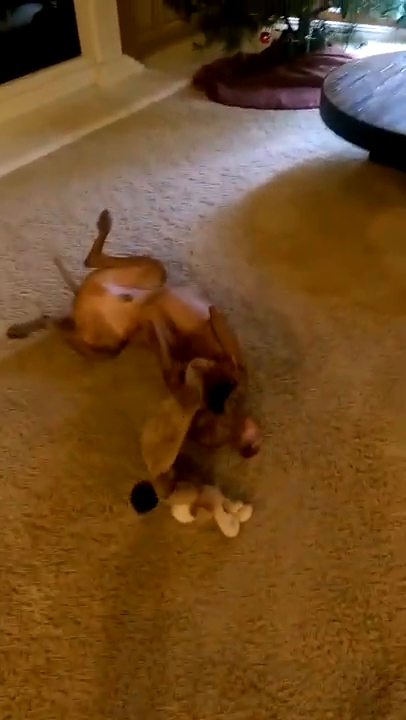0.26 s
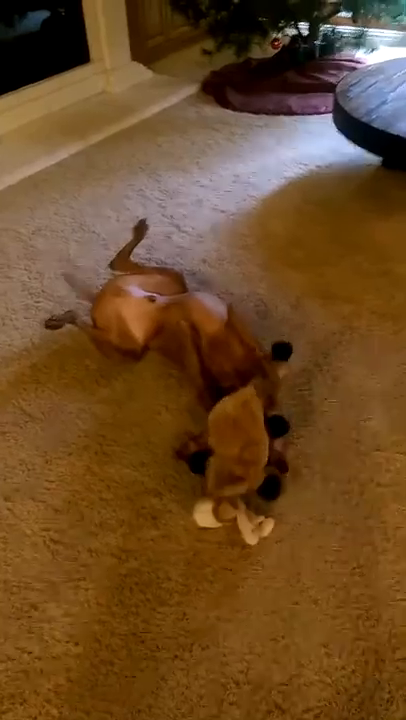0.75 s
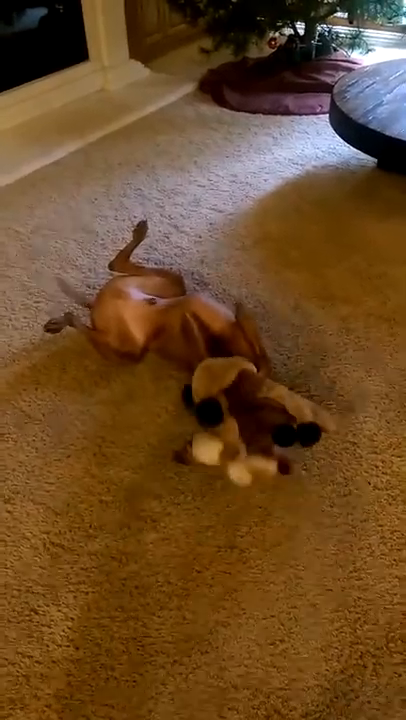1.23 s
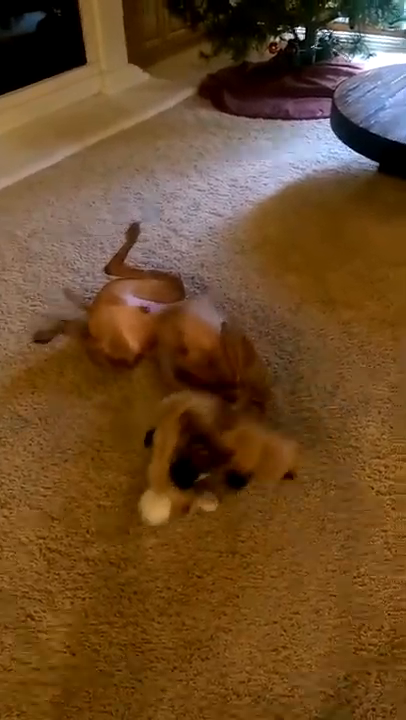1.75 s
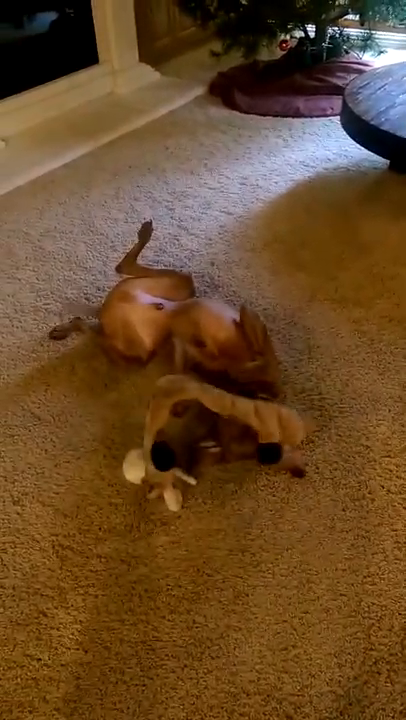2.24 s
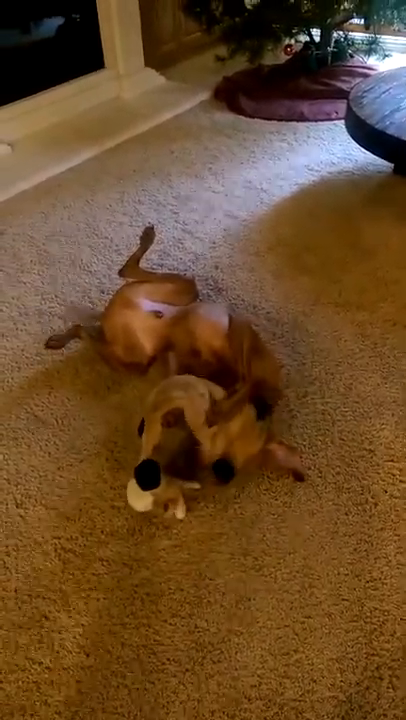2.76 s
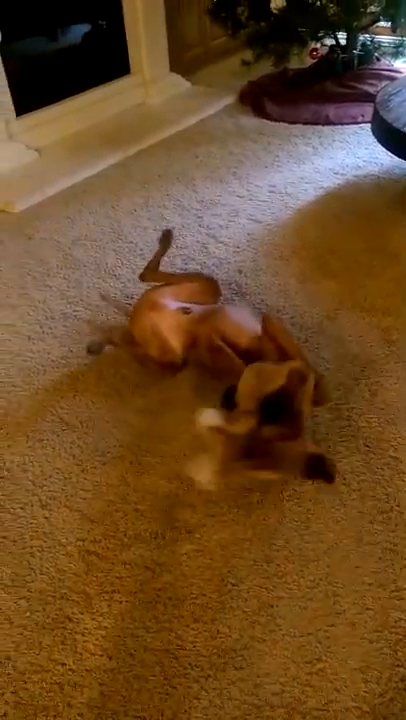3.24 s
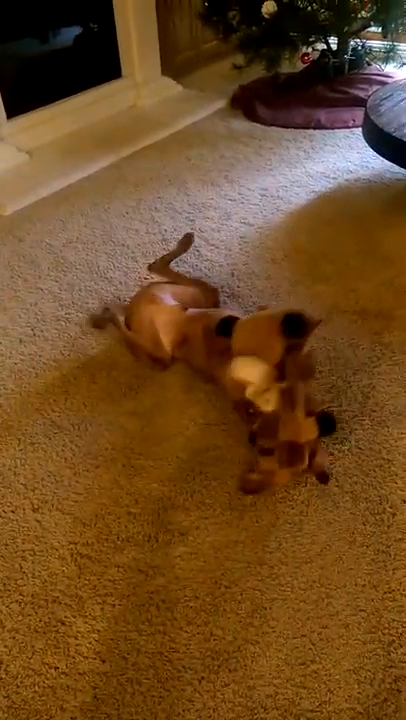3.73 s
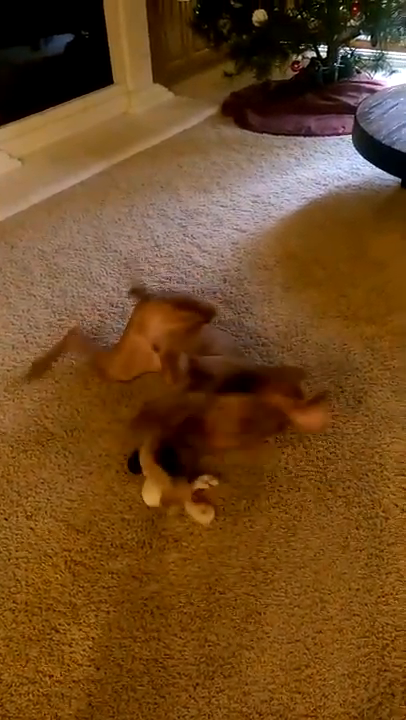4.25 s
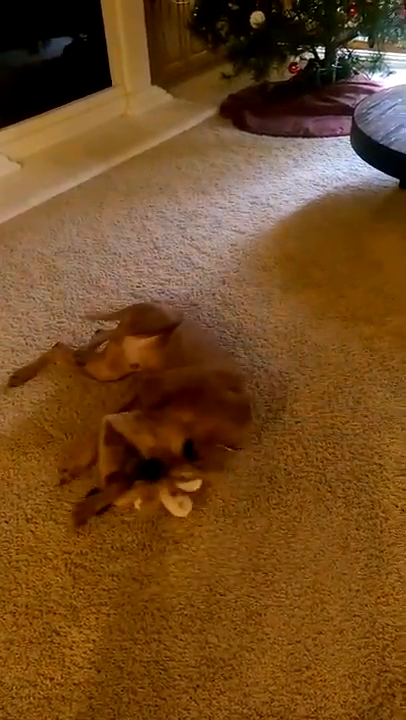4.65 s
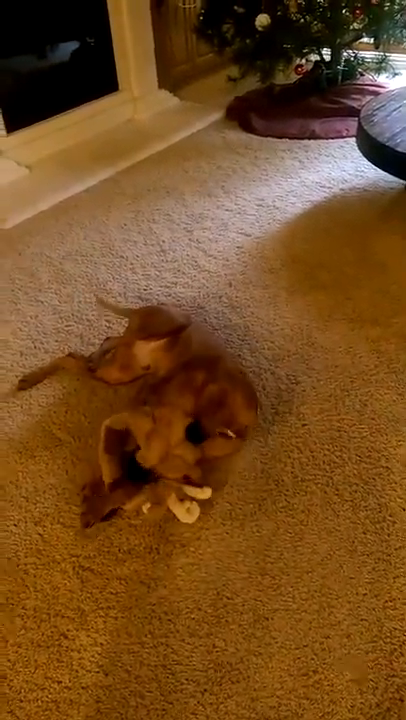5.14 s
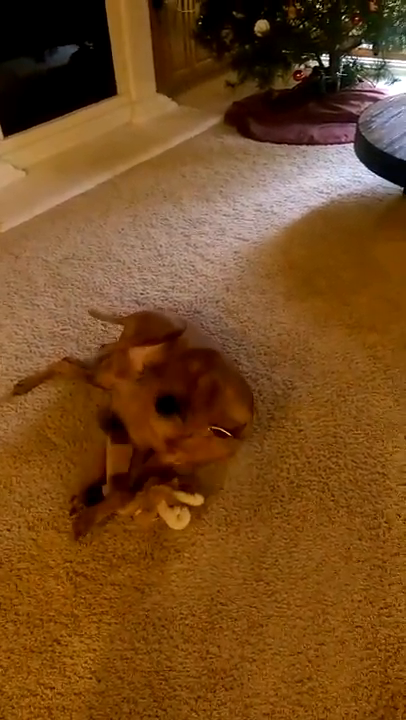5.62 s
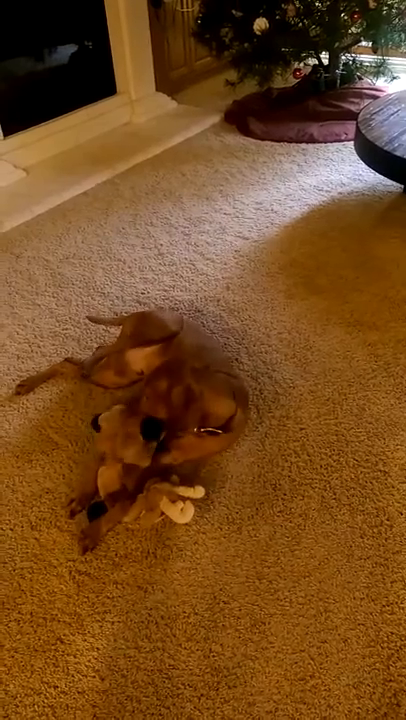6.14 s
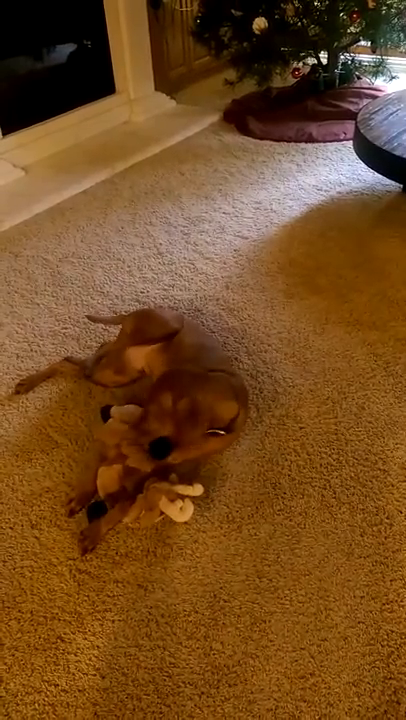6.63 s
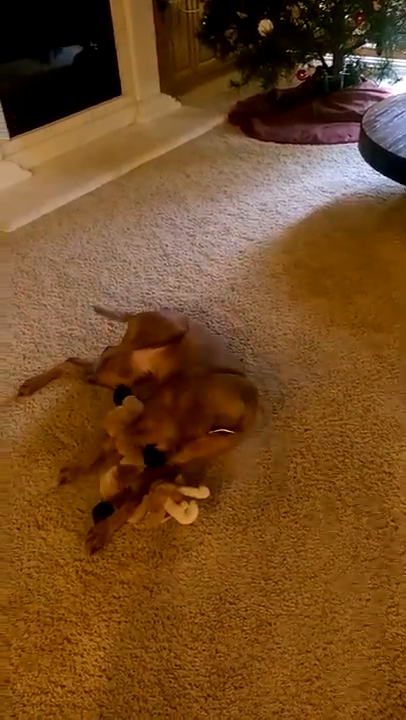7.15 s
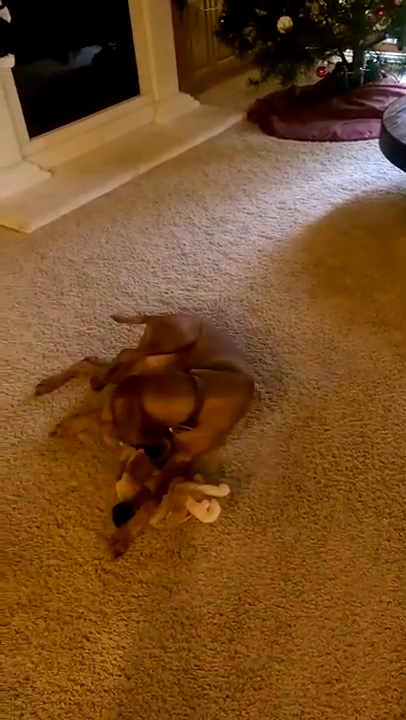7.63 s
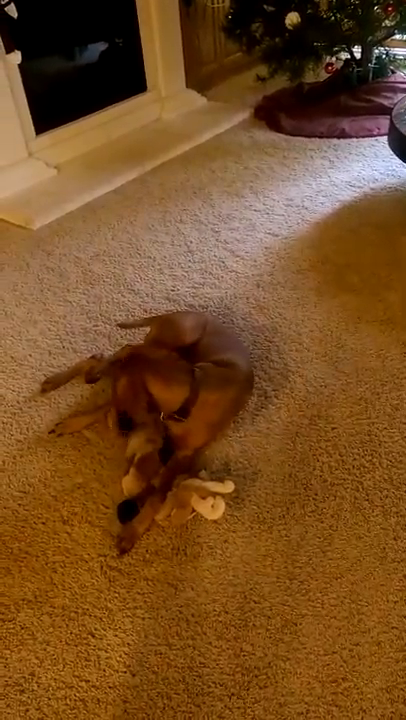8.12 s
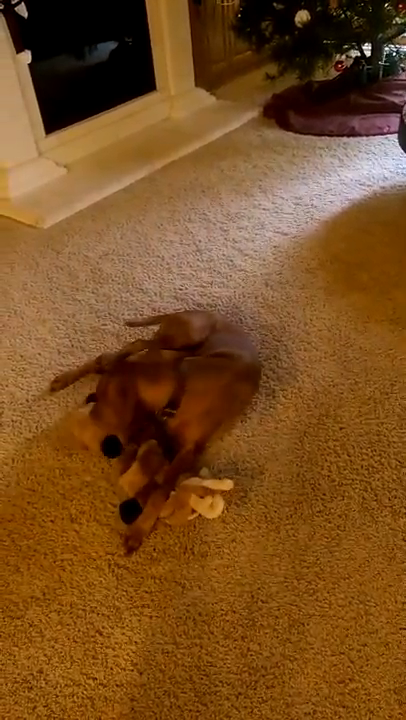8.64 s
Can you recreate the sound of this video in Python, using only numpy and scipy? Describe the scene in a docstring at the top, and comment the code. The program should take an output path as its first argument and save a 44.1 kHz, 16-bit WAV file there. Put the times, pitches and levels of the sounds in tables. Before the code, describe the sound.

Indoors, a couple of metres from the microphones, a squeaky toy is bitten in irregular runs. Quick reedy peeps are followed by raspy, arching squeals: a burst at the start, a lone squeal near two seconds, a busier run from three and a half to just past six, then fainter squeaks near the end. Soft plush rubs, tooth knocks and collar tag clinks sit over low rumble and hum.

```python
"""A living room carpet, a camera's two microphones a couple of metres from a dog chewing a plush toy.
The room's tail of an earlier squeal opens; bites and squeals follow at once, and again from 3.4 to 6.3 s.
A bite drives air through the squeaker's reed at a nearly steady pitch; the refilling bulb squeals in an arch.
Between them plush rubs on carpet and the body shifts; from 2.2 s teeth knock, from 4.9 s collar tags clink.
Quieter squeaks come near the end; low rumble, thin hiss and a wavering hum of the house run throughout."""
import sys
import numpy as np
from scipy import signal
from scipy.fft import rfft, irfft, next_fast_len
from scipy.io import wavfile

SR = 44100
rng = np.random.default_rng(int(sys.argv[2]) if len(sys.argv) > 2 else 0)


def generate_wav(sig):
    """Save sig (samples, or channels by samples) to the path in sys.argv[1] as 16-bit PCM at SR."""
    pcm = np.round(np.clip(np.atleast_2d(sig).T, -1, 1) * 32767).astype(np.int16)
    wavfile.write(sys.argv[1], SR, pcm)


N = 391608

# Bites, each pressing harder or easing off at most once; from bass on, the grip on the toy:
# (start [s], length [s], base pitch [Hz], base level [dB], nudge after [s], nudge [octaves], bass [dB],
#  treble [dB], cavity [Hz], cavity [dB], right microphone [dB], rasp [0-1])
BITE_GESTURES = [(0.168, .067, 854, -22, 0.015, -0.12, -2, 3, 5840, 4, -9.5, .1),
                 (0.792, 0.012, 864, -26, 0, 0, -4.5, -3.5, 9600, 5.5, -7, .8),
                 (3.453, 0.064, 849, -21.5, .04, -0.21, 0, 1.5, 4640, 7.5, -11, .3),
                 (3.98, 0.065, 865, -22, 0.041, -0.15, -13.5, -3.5, 6000, 5, -9, .1),
                 (4.426, .028, 904.5, -22.5, 0, -0.014, -9, -4, 6200, -3, -9.5, .2),
                 (5.444, .095, 852.8, -25, 0.055, 0.018, -11.5, 1.5, 5300, -5.5, -9, .06),
                 (6.044, 0.12, 829, -28, .098, .058, -5.5, 8.5, 7460, 10.5, -9, 0.12),
                 (7.956, 0.16, 831.8, -40, 0.07, 0.045, 2, 5, 3870, 7, -6.5, 0.25)]
# Arching squeals of air rushing through the reed, mostly as the bulb refills; the jaws may nudge the flow once:
# (start [s], length [s], top pitch [Hz], last pitch [Hz], base level [dB], rise [s],
#  hold [under 1 sags early, over 1 holds], nudge after [s], nudge [octaves], bass [dB], treble [dB],
#  cavity [Hz], cavity [dB], right microphone [dB], rasp [0-1])
SQUEAL_GESTURES = [(-0.22, .12, 1119, 1061, -29.5, 0.04, 1.8, 0, 0.045, 4, 4.5, 5300, 1.5, -5, .8),
                   (0.229, 0.054, 3120, 2580, -20.5, 0.053, 0.88, 0.011, 0.31, -9.5, 3, 6330, 8.5, -11, 0.28),
                   (0.323, 0.13, 1201, 1016, -26, .064, 2.4, 0.0226, -.05, -2.5, 3, 4770, 3.5, -7.5, 0.74),
                   (0.878, 0.14, 1483, 748.5, -27.5, 0.021, 0.79, 0.078, 0.1, -2.5, -0.5, 3200, -1, -8, .65),
                   (2.118, 0.061, 1695, 1073, -22, 0.039, 0.84, 0.0083, .18, -3.5, 2.5, 9200, -2, -8.5, .92),
                   (3.614, 0.11, 1209, 910, -24, 0.015, 23.3, 0, 0.054, 5, 6.5, 4900, 7, -12, 1),
                   (4.069, .084, 1801, 846, -20.5, .044, 1.7, .062, -0.19, -3, 1, 5600, 5, -13, .85),
                   (4.518, .088, 1288, 865, -24, 0.032, 16, .071, 0.27, -3, 6.5, 2700, 1.5, -13, 0.71),
                   (5.036, .105, 1300, 850.4, -22.5, .025, .58, .082, .12, -6, 8.5, 3600, -2.5, -12.5, .3),
                   (5.558, 0.11, 3380, 953, -18.5, .047, 1.64, .024, -0.21, -4, 6.5, 5600, 1.5, -10.5, .4),
                   (6.186, 0.12, 1003, 916, -27.5, 0.015, 0.82, 0.028, .17, 0.5, 3.5, 8600, 20, -4.5, .28),
                   (8.151, .05, 1030, 894, -36.5, 0.015, 0.94, 0.035, -0.072, -6, -5.5, 8800, 14.5, -4, .6),
                   (8.523, 0.025, 972, 932, -34.5, .012, 1.2, 0.00043, -.15, 2.5, -1.5, 8700, 20, -0.5, 0.82)]
# The reed heard through bulb and plush, blowing out: (frequency [Hz], relative level [dB])
BLOWING_COLOUR = [(800, -12.5), (1700, -9.5), (2550, -10), (3400, -13), (4250, -7.5), (5200, -5.5),
                  (6200, -8), (7400, -14), (8500, -19), (10000, -23), (12500, -31), (15000, -36)]
# The same, drawing in: (frequency [Hz], relative level [dB])
DRAWING_COLOUR = [(850, -7.5), (1250, -6.5), (2400, -5), (3300, -9), (4200, -5), (5400, -7), (6100, -13.5),
                  (6900, -26), (8000, -21.5), (11000, -22.5), (13300, -24.5), (15000, -34.5)]
# Shading of the right microphone by the camera body: (frequency [Hz], gain [dB])
CAMERA_SHADE = [(900, 6.5), (2500, 1.5), (5500, -7), (9000, -26), (14000, 5.5)]
# Knocks of teeth and head: (time [s], peak level [dB], centre [Hz], decay [s])
TOOTH_KNOCKS = [(2.17, -41, 232, 0.016), (3.357, -53, 1180, 0.015), (3.712, -20, 2960, 0.00054),
                (3.968, -36, 2970, 0.003), (4.916, -40, 970, 0.0039)]
# Collar tags touching: (time [s], level [dB])
TAG_CLINKS = [(4.916, -48.5), (5.443, -39), (6.902, -39.5)]
# Ringing modes of the tags: (frequency [Hz], relative level [dB], t60 [s])
TAG_RINGING = [(5640, -18, 0.41), (5740, -11.5, .2), (12030, -13.5, .25), (12740, -10, .15),
               (13650, -3.5, .25)]
# Plush and fur rubbing on carpet: (time [s], length [s], level before fades [dB])
CARPET_RUBS = [(0.657, 0.15, -66.5), (1.094, 0.17, -62), (3.351, 0.13, -57), (3.874, 0.08, -60),
               (7.755, 0.1, -71), (8.366, 0.14, -67.5)]
# The dog's body shifting on the floor: (time [s], length [s], level before fades [dB])
BODY_SHIFTS = [(0, 1.14, -68.5), (3.202, 1.62, -67.5), (4.396, 2.3, -69), (7.7, 1.24, -68.5)]
# Reverberation of the room: (frequency [Hz], t60 [s], relative level [dB])
ROOM_BANDS = [(581.4, 0.58, 8), (1482, 0.57, 1.5), (4340, 0.53, -3.5), (8020, 0.51, -4), (13200, 0.43, 1.5)]
# Spectrum of the still air of the house: (frequency [Hz], relative density [dB])
AIR_SPECTRUM = [(20, -20), (55, -4.5), (90, -6.5), (160, -3), (230, -1), (320, -8.5), (430, -9.5),
                (620, -18), (1200, -20), (4000, -24), (16000, -29)]
# Hum lines of an appliance: (frequency [Hz], level [dB])
HUM_LINES = [(59.7, -73), (119.4, -69), (215.3, -72), (360.7, -76), (419.9, -75)]
# Left-right likeness of the air: (frequency [Hz], likeness [0-1])
AIR_LIKENESS = [(200, 0.56), (1500, 0.32), (8000, .1)]

AIR_DB = -63  # before the slight left-right balance
LEAD_S = 0.3  # the mix begins this early
EDGE_HZ = 15900  # upper edge of the recorder
# Bite: depth and time of the opening scoop and closing droop; nudge width; level follows pitch
SCOOP_OCTAVES, SCOOP_S, DROOP_OCTAVES, DROOP_S = 0.05, 0.007, 0.1, 0.007
BITE_NUDGE_S, BITE_DB_PER_OCTAVE = 0.011, 51.5
# Squeal: one starting pitch, weaker ends than top, and a starved reed below the starting pitch
START_HZ, START_DB, STOP_DB, STARVED_DB_PER_OCTAVE = 947, -5.5, -7, 30
SQUEAL_NUDGE_S, NUDGE_DB_PER_OCTAVE = 0.008, 3
# Rasp: pitch flutter, strength of half-order lines, harmonic where they are full, growth time [s]
RASP_FLUTTER, DOUBLING, DOUBLING_HARMONIC, DOUBLING_S = 0.015, 0.94, 3.5, 0.02
# Width of the cavity resonance as a share of its frequency
BITE_CAVITY_SHARE, SQUEAL_CAVITY_SHARE = 0.11, 0.16


def squeaker(mix, rows, gesture, colour, cavity_share, release_s, room_db=-8.5, turned=0.47):
    """Sends each squeak to the left microphone, the shaded right one a moment later, and the room."""
    for *push, bass_db, treble_db, cavity_hz, cavity_db, right_db, rasp in rows:
        note = gesture(*push)
        grip = bass_db, treble_db, cavity_hz, cavity_share * cavity_hz, cavity_db
        hz, response = passage(colour, grip)
        left = squeak(note, hz, response, np.clip(rasp, 0, 1), release_s)
        later = np.pad(left, (4, 0))  # samples of extra path
        right = shaped(later, lambda f: amp(read(CAMERA_SHADE, f)))[:len(left)]
        # a toy turned away from the camera sounds both more central and more distant
        wet_db = room_db + turned * (right_db + 15.5)
        add(mix, note[0][0], np.array([left, amp(right_db) * right, amp(wet_db) * left]))


def bite(start, length, hz, db, nudge_s, nudge_octaves):
    """Pitch and level under the closing jaws: pressure builds, is nudged once and runs out."""
    t = np.linspace(0, length, 200)
    scoop = SCOOP_OCTAVES * np.exp(-t / SCOOP_S)
    droop = DROOP_OCTAVES * np.exp((t - length) / DROOP_S)
    octaves = nudge_octaves * bell(t, nudge_s, BITE_NUDGE_S) - scoop - droop
    return np.transpose([start + t, hz * 2 ** octaves, db + BITE_DB_PER_OCTAVE * octaves])


def squeal(start, length, top_hz, last_hz, db, rise_s, hold, nudge_s, nudge_octaves):
    """Pitch and level follow the air flow, which swells to a top, holds and gives out."""
    t = np.linspace(0, length, 200)
    building = np.cos(np.pi / 2 * np.minimum(t / rise_s, 1)) ** 2
    spent = np.clip((t - rise_s) / (length - rise_s), 0, 1) ** abs(hold)
    nudge = nudge_octaves * bell(t, nudge_s, SQUEAL_NUDGE_S)
    hz = top_hz * (START_HZ / top_hz) ** building * (last_hz / top_hz) ** spent * 2 ** nudge
    ends_db = START_DB * building + STOP_DB * spent
    starved_db = STARVED_DB_PER_OCTAVE * np.minimum(np.log2(hz / START_HZ), 0)
    level_db = db + ends_db + NUDGE_DB_PER_OCTAVE * nudge + starved_db
    return np.transpose([start + t, hz, level_db])


def passage(colour, grip):
    """Causal response from reed to air: the jaws cover the toy and form a cavity around it."""
    bass_db, treble_db, cavity_hz, width_hz, cavity_db = grip
    hz = abs(np.fft.fftfreq(2048, 1 / SR))
    bass_shelf = bass_db / (1 + (hz / 1300) ** 6)
    treble_shelf = treble_db / (1 + (7000 / (hz + 1)) ** 10)
    db = read(colour, hz) + bass_shelf + treble_shelf + cavity_db * bell(hz, cavity_hz, width_hz)
    # minimum phase from the log gain
    response = np.exp(np.conj(signal.hilbert(np.log(amp(db)))))
    half = len(hz) // 2
    return hz[:half], response[:half]


def squeak(note, hz, response, rasp, release_s, hiss_db=-27, rasp_hiss_db=18, drift=0.0033,
           waver_db=2, pure_hz=3400, attack_s=0.00364):
    """The reed chops the air once a cycle; when it rasps it flutters, hisses and sounds between its harmonics."""
    s, pitch, level_db = np.transpose(note)
    t = np.arange(s[0] - attack_s / 2, s[-1] + release_s / 2, 1 / SR)
    flutter = (0.0015 + RASP_FLUTTER * rasp) * wander(len(t), hz=600)
    pitch = np.interp(t, s, pitch) * (1 + drift * wander(len(t), hz=60.6) + flutter)
    angle = 2 * np.pi * np.cumsum(pitch) / SR
    k = np.arange(1, 20, 0.5)[:, None]  # harmonics and the half-orders between
    # driven fast, the reed swings more nearly as a sine
    rolloff = k ** -((pitch / pure_hz) ** 2)
    partials = np.interp(k * pitch, hz, response) * (k * pitch < SR / 2) * rolloff

    # long and short cycles soon begin to alternate: unsteady half-order lines, stronger higher up
    between = k % 1 > 0
    growth = 1 - np.exp(-(t - t[0]) / DOUBLING_S)
    doubling = DOUBLING * rasp ** 2 * np.minimum(k / DOUBLING_HARMONIC, 1) * growth
    waver = np.array([wander(len(t), hz=50) for _ in k])
    smear = np.array([wander(len(t), hz=160) for _ in k])
    smear_depth = np.where(between, 1, rasp * np.minimum(k / 8, 1))
    partials = partials * np.where(between, doubling, 1) * amp(waver_db * waver)
    partials = partials * np.exp(1j * smear * smear_depth)

    # the stuffing blunts each pulse by scattering its phases
    scatter = 0.35 * rng.standard_normal(k.shape)
    waves = (partials * np.exp(1j * (k * angle + scatter))).real
    power = (abs(partials) ** 2).sum(0) / 2
    tone = waves.sum(0) / np.sqrt(power)

    puffs = rng.standard_normal(len(t)) * (1 + np.cos(angle))
    low_hz = 2 * pitch.mean()  # the hiss thins out below this
    hiss = unit(shaped(puffs, lambda f: np.interp(f, hz, abs(response)) * np.minimum(f / low_hz, 1) ** 4))
    gate = np.clip(np.minimum((t - t[0]) / attack_s, (t[-1] - t) / release_s), 0, 1) ** 2
    level = amp(np.interp(t, s, level_db))
    return gate * level * (tone + amp(hiss_db + rasp_hiss_db * rasp) * hiss)


def knock(hz, decay):
    """A dead blow of teeth or head: a noise burst that dies at once."""
    t = np.arange(SR // 8) / SR
    burst = band_noise(len(t), hz, octaves=0.97) * np.exp(-t / decay)
    return burst / abs(burst).max()


def clink(tick_db=-1, tick_s=0.0017, damped_s=0.042, damping_s=0.08):
    """Tags tick and ring until they fall back against the fur."""
    t = np.arange(SR // 4) / SR
    ring = sum(amp(db - 60 * t / t60) * np.sin(2 * np.pi * hz * t) for hz, db, t60 in TAG_RINGING)
    tick = amp(tick_db) * band_noise(len(t), hz=7860, octaves=1.0) * np.exp(-t / tick_s)
    fur = np.exp(-np.maximum(t - damped_s, 0) / damping_s)
    return tick + ring * fur


def rub(length, grain_db=4):
    """Fibres catch and slip under a short stroke, so the noise is grainy."""
    count = round(length * SR)
    grain = amp(grain_db * wander(count, hz=150))
    return unit(band_noise(count, hz=3200, octaves=1.9) * grain) * np.hanning(count)


def shift(length):
    """A dull rumble that swells and fades as the dog rolls."""
    count = round(length * SR)
    return band_noise(count, hz=162, octaves=1.0) * np.sqrt(np.hanning(count))


def room(x, gap_s=0.004, early_db=3, early_s=0.015):
    """Scattered reflections, stronger at first, each band dying at its own speed."""
    count, spacing = 1800, 20  # reflections, samples
    at = np.arange(count) * spacing + rng.integers(0, spacing, (2, count))
    taps = np.zeros((2, count * spacing))
    np.put_along_axis(taps, at, rng.choice([-1., 1.], at.shape), 1)
    hz, t, z = signal.stft(taps, SR, nperseg=256)
    decay_db = -60 * t / read(ROOM_BANDS, hz)[:, None]
    band_db = read(ROOM_BANDS, hz, axis=2)[:, None]
    z = z * amp(decay_db + band_db + early_db * np.exp(-t / early_s))
    gap = round(abs(gap_s) * SR)
    tail = np.pad(signal.istft(z, SR)[1], ((0, 0), (gap, 0)))
    return signal.fftconvolve(x[None], tail / np.linalg.norm(tail[0]), axes=1)[:, :len(x)]


def house():
    """Low rumble and thin hiss of the house, with the wavering hum of an appliance."""
    shared, own = rng.standard_normal((2, N))

    def same(f):
        """Share of the left signal found in the right at each frequency."""
        return np.clip(read(AIR_LIKENESS, f), 0, 1)

    right = shaped(shared, same) + shaped(own, lambda f: np.sqrt(1 - same(f) ** 2))
    pair = np.array([shared, right])
    air = amp(AIR_DB) * unit(shaped(pair, lambda f: amp(read(AIR_SPECTRUM, f))))
    t = np.arange(N) / SR
    hum = np.zeros(N)
    for hz, db in HUM_LINES:
        level = amp(db) * np.sqrt(2) * (1 + 0.2 * wander(N, hz=4))
        hum += level * np.sin(2 * np.pi * hz * t + wander(N, hz=2))
    return (air + hum) * amp([[0.8], [0]])  # left a little louder


def amp(db):
    """Decibels to gain."""
    return 10 ** (np.asarray(db) / 20)


def unit(x):
    """Scales to rms 1."""
    return x / np.sqrt(np.mean(x ** 2) + 1e-20)


def bell(x, centre, width):
    """A bump of height 1."""
    return np.exp(-0.5 * ((x - centre) / width) ** 2)


def read(points, hz, axis=1):
    """Reads one column of a table on a log-frequency axis."""
    columns = np.transpose(points)
    return np.interp(np.log(hz + 1), np.log(columns[0] + 1), columns[axis])


def shaped(x, gain):
    """Filters by a gain that is a function of frequency."""
    size = next_fast_len(x.shape[-1])
    spectrum = rfft(x, size) * gain(np.fft.rfftfreq(size, 1 / SR))
    return irfft(spectrum, size)[..., :x.shape[-1]]


def wander(count, hz):
    """Smooth random drift of about rms 1, mostly slower than hz."""
    noise = rng.standard_normal(count + 8192)
    return unit(shaped(noise, lambda f: 1 / (1 + (f / hz) ** 2)))[:count]


def band_noise(count, hz, octaves):
    """Noise of rms 1 in a bell around hz."""
    noise = rng.standard_normal(count)
    return unit(shaped(noise, lambda f: bell(np.log2((f + 1) / hz), 0, octaves)))


def add(mix, s, sound):
    """Adds a sound at time s to a mix that begins LEAD_S early."""
    first = max(round((s + LEAD_S) * SR), 0)
    part = mix[..., first:][..., :sound.shape[-1]]
    part += sound[..., :part.shape[-1]]


def scene():
    """Toy and dog, heard directly and through the room, over the house."""
    lead = round(LEAD_S * SR)
    mix = np.zeros((3, lead + N))  # left, right, into the room
    squeaker(mix, BITE_GESTURES, bite, BLOWING_COLOUR, BITE_CAVITY_SHARE, release_s=0.0014, room_db=-9.5)
    squeaker(mix, SQUEAL_GESTURES, squeal, DRAWING_COLOUR, SQUEAL_CAVITY_SHARE, release_s=0.0052, room_db=-9.5)
    spread = amp([[0], [-3], [-10]])
    for s, db, hz, decay in TOOTH_KNOCKS:
        add(mix, s, spread * amp(db) * knock(hz, decay))
    for s, db in TAG_CLINKS:
        add(mix, s, spread * amp(db) * clink())
    for s, length, db in CARPET_RUBS:
        add(mix, s, spread * amp(db) * rub(length))
    for s, length, db in BODY_SHIFTS:
        add(mix[:2], s, amp([[0], [-1]]) * amp(db) * shift(length))  # direct only
    return (mix[:2] + room(mix[2]))[:, lead:] + house()


def record(dry):
    """The recorder's band limit: a steep low-pass."""
    lowpass = signal.firwin(511, EDGE_HZ, window=("kaiser", 9), fs=SR)
    return signal.oaconvolve(dry, lowpass[None], "same")


dry = scene()
out = record(dry)
generate_wav(out)
```